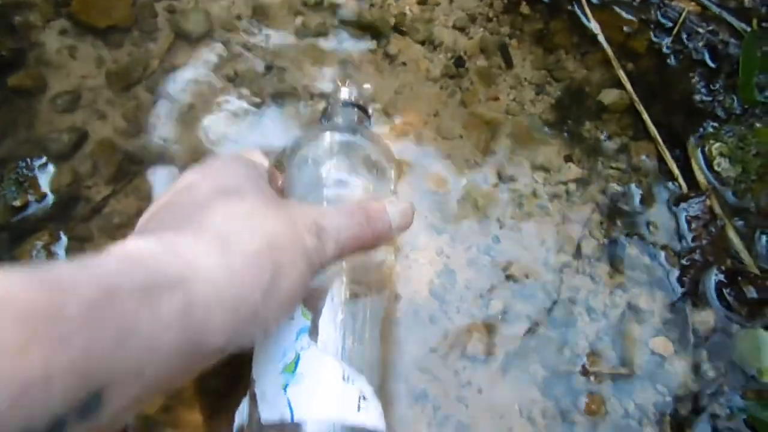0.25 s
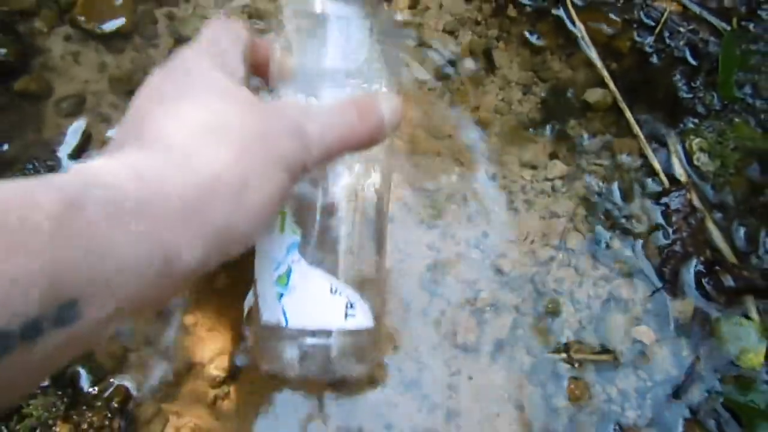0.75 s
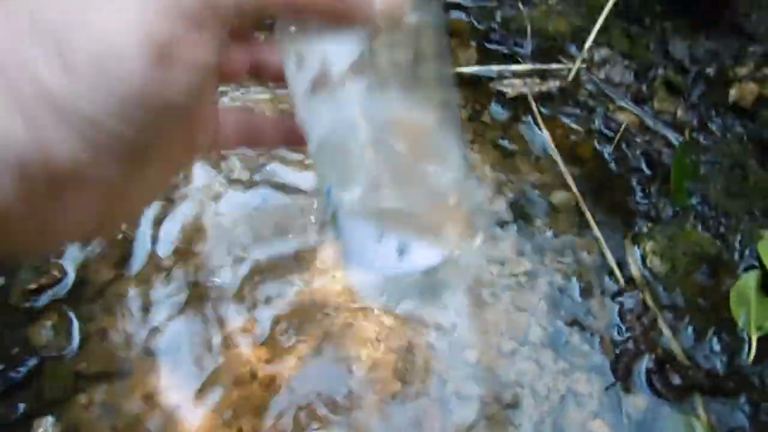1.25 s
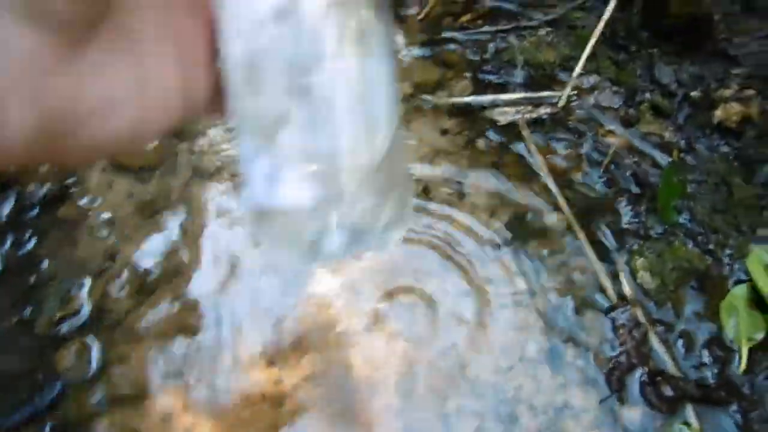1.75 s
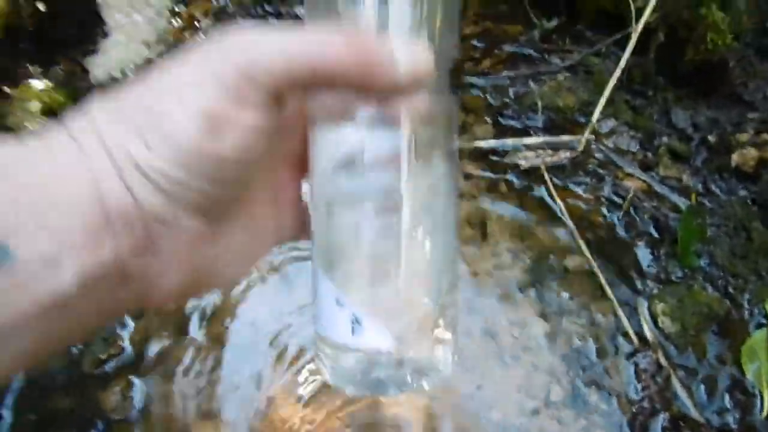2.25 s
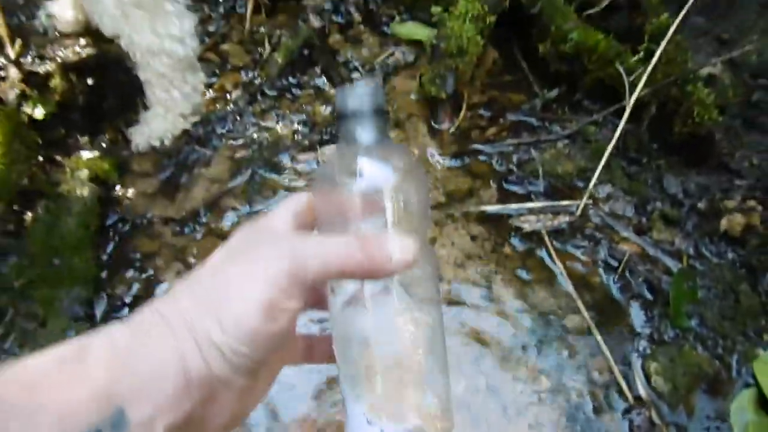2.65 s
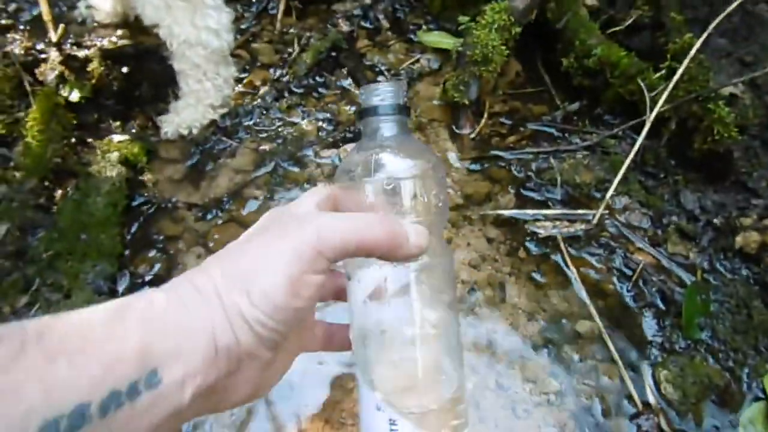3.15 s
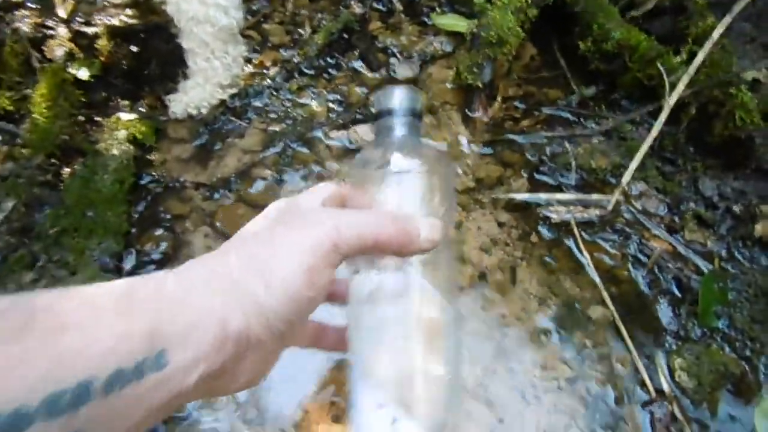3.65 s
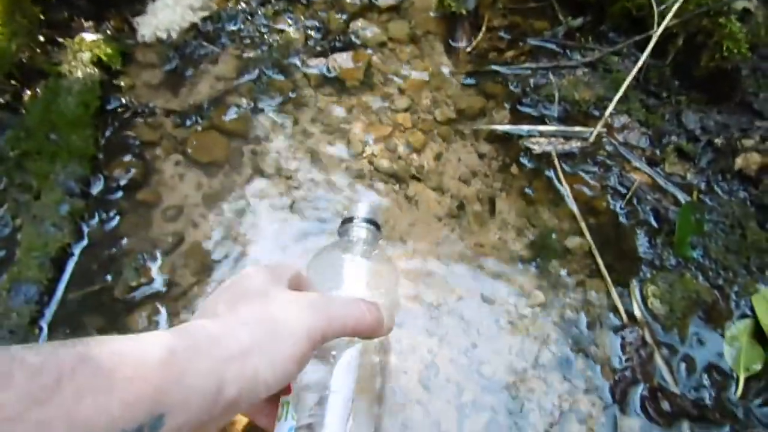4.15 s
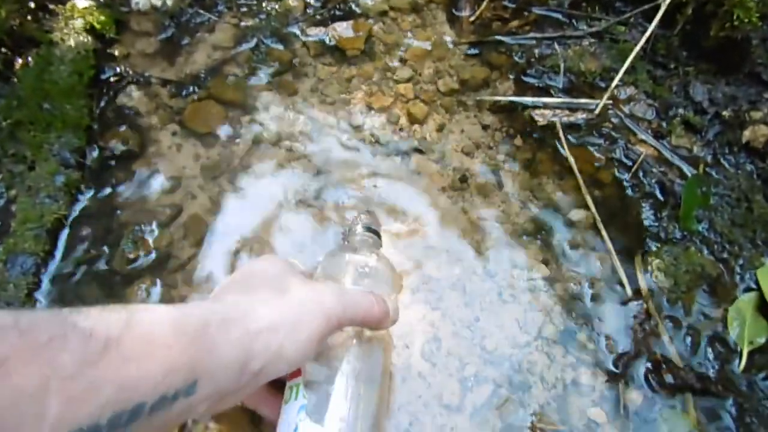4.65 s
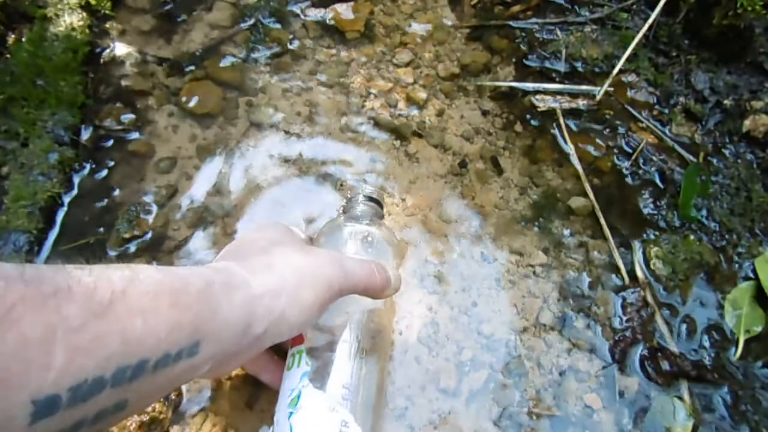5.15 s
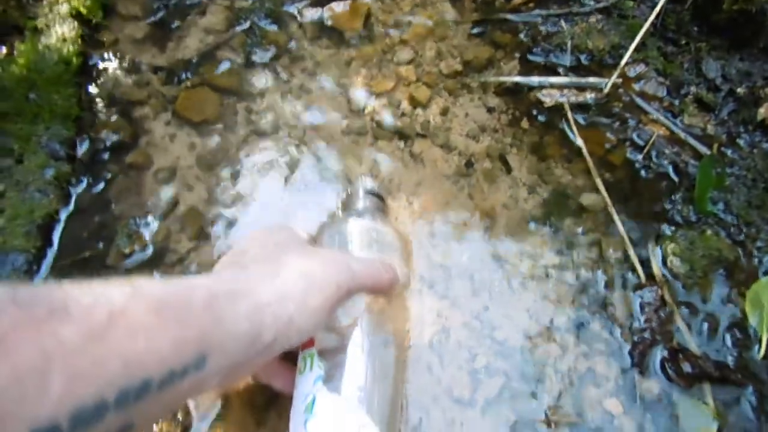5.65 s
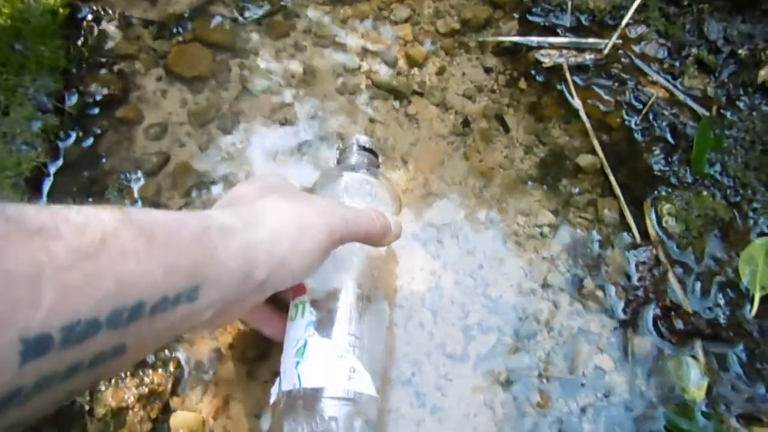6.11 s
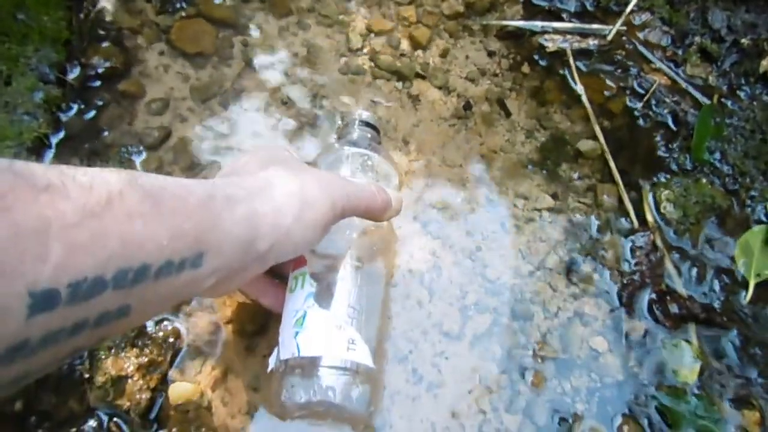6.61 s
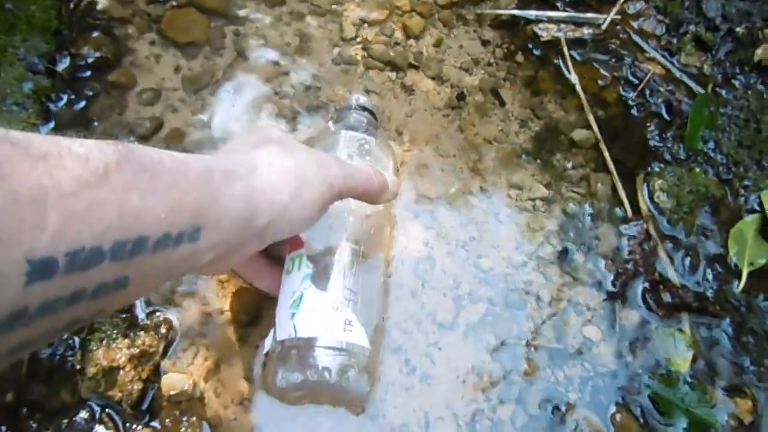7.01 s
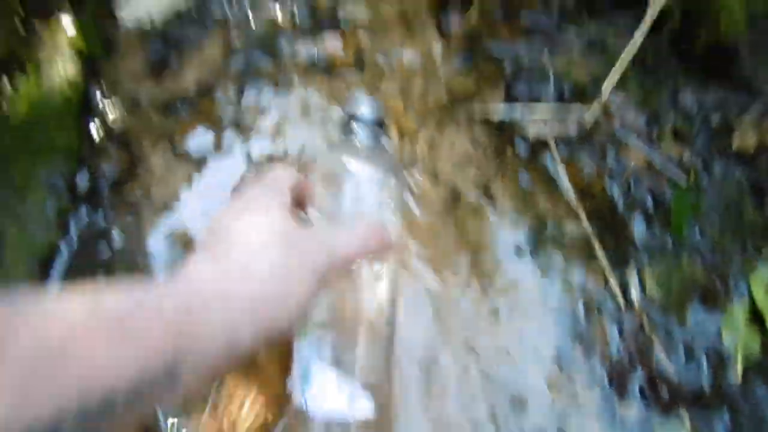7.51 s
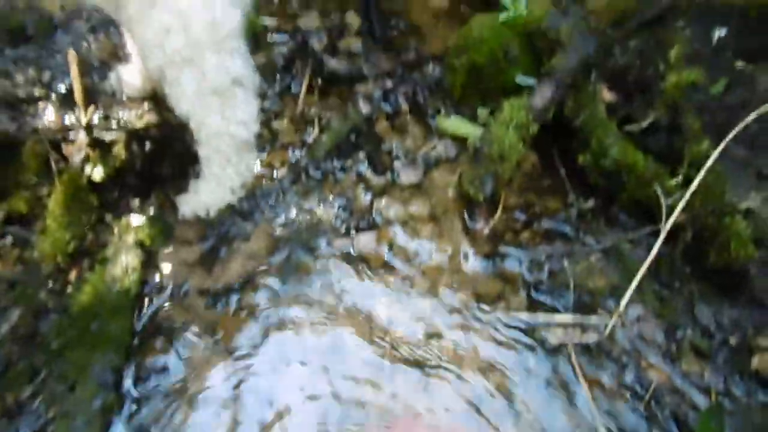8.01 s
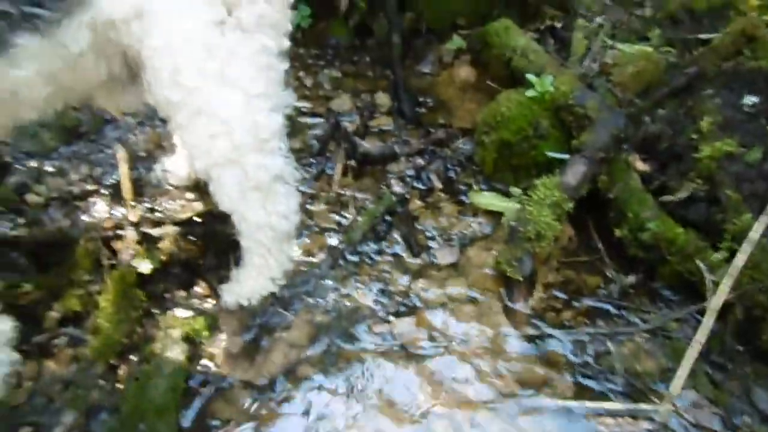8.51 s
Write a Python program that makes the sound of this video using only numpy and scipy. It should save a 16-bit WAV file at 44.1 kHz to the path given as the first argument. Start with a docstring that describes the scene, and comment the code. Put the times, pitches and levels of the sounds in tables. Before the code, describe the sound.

Outdoors in woodland, near the microphone, a hollow bottle rattles on streambed stones and water gurgles. A high, quick songbird chirps, then trills over a soft water wash. The bottle goes back in with light ticks and intermittent scrapes, then is pulled out with brighter crackles, plopping bubbles and splashing drops, ending in stream hush and a low handling thud.

```python
"""A plastic bottle is pushed into a shallow woodland stream, lifted, dipped again and taken out.
Its thin wall scrapes and ticks on the gravel: bursts and clicks of force excite damped wall modes.
Water gulps at the neck, drips back and trickles: decaying sines of rising pitch, for air in the water.
A small bird sings a long, fast song among the trees: gliding sines, frequency-modulated where they buzz.
Shaped noise makes the soft wash of the stream and a dull rumble near the end."""
import sys
import numpy as np
from scipy import signal
from scipy.fft import rfft, irfft, next_fast_len
from scipy.io import wavfile
from scipy.ndimage import uniform_filter1d

SR = 44100
rng = np.random.default_rng(int(sys.argv[2]) if len(sys.argv) > 2 else 0)


def pcm_store(signal):
    """Save signal as 16-bit PCM."""
    levels = np.round(np.clip(np.atleast_2d(signal), -1, 1) * 32767)
    wavfile.write(sys.argv[1], SR, levels.astype(np.int16).T)


N = 386757
TIME = np.arange(N) / SR  # s

# three figures of birdsong that the trills repeat, one syllable a row:
# delay/s, length/s, start f/Hz, end f/Hz, relative level/dB, buzz depth/Hz
CHIP = [(0, .07, 7870, 7320, -8.5, 258), (0.062, .028, 6160, 5900, -1.5, 60),
        (0.075, .049, 5400, 4950, 1, 650)]
BUZZ = [(0, 0.0664, 5330, 5110, 0, 650)]
UPSWEEP = [(0, 0.06, 4840, 5875, -.5, 542), (.033, .06, 6320, 6680, -1, 90.8),
           (.121, .046, 4850, 4100, -5, 480)]


def amp(db):
    """A level in decibels is 20 times the logarithm of amplitude; this inverts it to a gain."""
    return 10 ** (np.asarray(db) / 20)


def unit(x):
    """Normalises the root-mean-square amplitude to 1."""
    return x / np.sqrt(np.mean(x ** 2) + 1e-20)


def level(curve):
    """An envelope linear in decibels: gain at every sample from rows of t/s, level/dB."""
    return amp(np.interp(TIME, *np.transpose(curve)))


def add(mix, s, sound):
    """Superposition: sums a sound into the mix from time s."""
    part = mix[max(round(s * SR), 0):][:len(sound)]
    part += sound[:len(part)]


def colour(x, points):
    """Zero-phase spectral filtering: gain interpolated over log frequency from rows of f/Hz, gain/dB."""
    hz, db = np.transpose(points)
    size = next_fast_len(len(x))
    log_hz = np.log(np.fft.rfftfreq(size, 1 / SR) + 1)  # the 1 avoids log 0
    gain = amp(np.interp(log_hz, np.log(hz), db))
    return irfft(rfft(x, size) * gain, size)[:len(x)]


def grains(length, per_s, spread_db):
    """A random impulse train: clicks of either sign, mostly small, a few large."""
    sizes = amp(spread_db * np.minimum(rng.exponential(1, length), 4))
    signs = rng.choice([-1, 1], length)
    return sizes * signs * (rng.random(length) < per_s / SR)


def wash(wash_db=-58.45, swell_db=0.82):
    """Turbulence as broadband noise: the stream further off and the air in the trees, gently swelling."""
    # power spectrum of the wash: f/Hz, relative density/dB per Hz
    spectrum = [(12, -17), (20, -3), (53, -7), (70, -5), (146, -9), (188, -10), (282, -11.5), (353, -13),
                (443, -13.5), (854, -14), (921, -14), (2010, -16.5), (5110, -17.5), (7450, -19.5),
                (8240, -34), (10700, -62), (18100, -120)]
    swell = np.zeros(N)
    for f in np.geomspace(.3, 9, num=12):
        swell += np.sin(2 * np.pi * (f * TIME + rng.random())) / np.sqrt(f)
    noise = unit(colour(rng.standard_normal(N), spectrum))
    return amp(wash_db) * noise * amp(swell_db * unit(swell))


def bubble(hz, t60, rise):
    """Volume resonance: an air pocket rings and decays, rising in pitch (octaves/s) near the surface."""
    t = np.arange(int(t60 * SR) + 2) / SR
    turns = np.cumsum(hz * 2 ** (rise * t)) / SR
    decay = 1000 ** (-t / t60)
    onset = 1 - np.exp(-t * hz * 2)
    return np.sin(2 * np.pi * turns) * decay * onset


def stirring(attack_s=0.11, release_s=.13, calm_db=-69):
    """Powers of independent stirs add: each builds up, holds and calms down exponentially."""
    # water stirred by the hand, the bottle and a wading dog: t/s, length/s, level/dB
    stirs = [(.17, 0.52, -57), (2.499, 0.41, -69.5), (4.3, 0.64, -64), (5.6, 1.1, -66.5),
             (7.346, 0.39, -55.5), (8.333, 0.068, -60.5)]
    power = amp(calm_db) ** 2
    for s, length, db in stirs:
        before = np.maximum(s - TIME, 0)
        after = np.maximum(TIME - s - length, 0)
        gain = amp(db) * np.exp(-before / attack_s - after / release_s)
        power = power + gain ** 2
    return np.sqrt(power)


def trickle(per_s=45, cycles=12, spread_db=3.0, low_hz=450, high_hz=7000, tilt=0.69):
    """Many small bubbles of all sizes sum to a trickle, whose level follows the stirring of the water."""
    out = np.zeros(N)
    for hz in np.geomspace(low_hz, high_hz, num=40):
        t60 = cycles * rng.uniform(0.34, 2.4) / hz
        drop = bubble(hz, t60, 11) * (hz / low_hz) ** tilt
        out += signal.oaconvolve(grains(N, per_s, spread_db), drop)[:N]
    return unit(out) * stirring()


def resonate(x, hz, width):
    """A damped mode as one complex pole, whose radius sets the bandwidth; gain about 1 at its peak."""
    r = np.exp(-np.pi * width / SR)
    return 2 * signal.lfilter([1 - r], [1, -r * np.exp(2j * np.pi * hz / SR)], x).real


def wall(force, spread=0.00091, vary_db=3):
    """Modal response of the bottle to a force: a quick flutter of crowded modes and a few that ring on."""
    # modes of the wall, before random detuning and weighting: f/Hz, bandwidth/Hz, level/dB
    modes = [(600, 100, -11.5), (1030, 45, -11.5), (1160, 110, -11), (1937, 62, -2.5), (2034, 107, 2.5),
             (2460, 70, -6), (3207, 48, -1), (3580, 44, -9), (3990, 130, 2.5), (4360, 130, -2.5),
             (4970, 150, -8.5), (5520, 68, -13.5), (7040, 230, -1.5)]
    # broad colour of a grain of gravel on the wall: f/Hz, gain/dB
    contact = [(100, -20.5), (250, -10.5), (500, -1.5), (1000, -0.5), (1500, 1.5), (2000, -1.5),
               (3000, 4.5), (4200, -1.5), (5500, 1), (7200, -2.5), (8500, -17.5)]
    t = np.arange(SR // 200) / SR
    flutter = rng.standard_normal(len(t)) * np.exp(-t / spread)
    # keeping only the phase smears each click in time, with even colour
    flutter = irfft(np.exp(1j * np.angle(rfft(flutter))), len(t))
    force = np.convolve(np.pad(force, (0, SR // 20)), np.roll(flutter, SR // 2000))
    crowded = .5 * force
    ring = 0
    for hz, width, db in modes:
        a, b = rng.standard_normal(2)  # each point of contact favours other modes
        ring = ring + amp(db + vary_db * a) * resonate(force, hz * (1 + 0.018 * b), width)
    return colour(crowded + ring, contact)


def scrapes(per_s=2200, spread_db=3.5, hiss=0.26, arch=0.3, overrun=0.0052, body_db=9, uneven_db=2.0):
    """Stick-slip friction: each drag is a burst of tiny slips, and pressing down brings out the hollow body."""
    # the bottle drags over gravel: t/s, length/s, level/dB, low body from pressing down/dB (body_db adds)
    drags = [(0.108, 0.094, -52, -16), (0.255, 0.068, -45, -6.5), (.323, 0.022, -41, -3),
             (0.359, .014, -48, -6), (.411, .013, -48.5, -24), (.436, .031, -44, -8),
             (.482, 0.036, -38, -14), (0.537, 0.013, -39.5, -12), (0.554, 0.033, -39.5, -4.5),
             (.585, 0.065, -39.5, -3.5), (0.663, 0.0079, -40, -22), (0.679, 0.011, -42, -18),
             (0.716, 0.0064, -48, -20), (0.743, 0.047, -51, -18), (0.794, .02, -43, -6.5),
             (1.895, 0.015, -51, -18), (1.918, .075, -60.5, -17), (4.22, 0.1, -60, 0.5),
             (4.35, 0.047, -54, -6), (4.572, 0.19, -57.5, -2.5), (4.821, .11, -50.5, -5.5),
             (4.934, 0.08, -59, -14), (5.043, 0.052, -54, -7), (5.514, 0.097, -55, -4.5),
             (5.698, .07, -52, -16), (6.22, 0.018, -52.5, -19), (6.291, 0.07, -51, -3.5),
             (6.824, 0.029, -49.5, -5.5), (6.866, 0.093, -53.5, -11), (6.982, 0.086, -53.5, -4.5),
             (7.209, .014, -45.5, -10), (7.228, 0.053, -49, -9), (7.282, 0.036, -43, -10.5),
             (7.403, 0.035, -45, -20), (7.448, 0.051, -51, -12), (7.487, 0.018, -40, 3),
             (7.518, 0.036, -46, -12)]
    out = np.zeros(N)
    for s, length, db, press_db in drags:
        size = int((length + overrun) * SR)
        bumps = unit(uniform_filter1d(rng.standard_normal(SR // 2), size=300))[:size]  # over the stones
        stroke = np.hanning(size) ** (arch / 2)  # the bottle speeds up and sticks again
        stroke *= amp(uneven_db * bumps)
        slips = unit(grains(size, per_s, spread_db)) + hiss * rng.standard_normal(size)
        sound = wall(stroke * slips)
        # a hard drag makes the wall flex and crackle; pressing damps this slightly
        flex_db = 0.53 * (db + 46) - 0.02 * press_db
        balance = [(700, body_db + press_db), (1500, 0), (2000, flex_db),
                   (2500, 0.0085), (4200, 0.011), (6500, -2)]
        sound = colour(sound, balance)
        add(out, s, amp(db) * sound * np.sqrt(length * SR / np.sum(sound ** 2)))
    return out


def settling(count=14, from_s=4.3, to_s=6.8, middle_db=-43, spread_db=3.5):
    """A random point process: faint stones tick while the bottle lies and fills; rows of t/s, level/dB."""
    when, strength = rng.random((count, 2)).T
    times = from_s + (to_s - from_s) * when
    return list(zip(times, middle_db + spread_db * (2 * strength - 1)))


def ticks(decay=0.002, chatter=.35, gain_db=10, top_db=-4, low_db=-3):
    """Impulsive excitation: a stone or splashing drop gives a sharp click and a brief chatter."""
    # stones snap against the wall; the last two are clicks of drops splashing back into the water:
    # t/s, level/dB (gain_db adds)
    clicks = [(0.1917, -38), (0.2846, -28.5), (0.328, -28), (0.3406, -19.5), (0.4913, -28), (0.499, -21.5),
              (0.5447, -33), (0.5602, -28), (0.573, -30), (0.621, -20), (0.7198, -40), (4.2164, -30),
              (4.2233, -24), (5.2866, -39.5), (5.3353, -37), (5.3892, -32), (5.5872, -25.5), (6.0701, -38),
              (6.6888, -33.5), (6.834, -29.5), (6.894, -33.5), (6.9375, -30.5), (6.9807, -35),
              (7.0214, -33), (7.2185, -32), (7.4215, -28.5), (7.4914, -27), (7.5443, -28.5), (7.6236, -33),
              (7.6844, -28), (7.7624, -36)]
    out = np.zeros(N)
    t = np.arange(SR // 50) / SR
    for s, db in list(clicks) + settling():
        force = chatter * rng.standard_normal(len(t)) * np.exp(-t / decay)
        force[0] += 1
        # the drops' clicks are shaped by the same modes as the stones'
        sound = colour(wall(force), [(900, low_db), (1700, 0.0072), (4000, 0), (6000, top_db)])
        add(out, s, amp(db + gain_db) * sound / np.linalg.norm(sound))
    return out


def gulps(ring_s=0.071, ring_slope=0.44, rise=1.1):
    """Resonating air volumes: larger pockets and drops ring lower and longer (ring_s is t60 at 1 kHz)."""
    # air ringing in the bottle and in bubbles, and drops falling back: t/s, starting f/Hz, peak level/dB
    pockets = [(.291, 123, -46.5), (.445, 588, -47.5), (.497, 1290, -44), (.512, 1010, -42),
               (.58, 538, -44), (.622, 232, -48), (.81, 1250, -44), (4.225, 976, -52), (4.225, 1680, -44.5),
               (4.284, 1040, -50), (6.36, 168, -51.5), (6.84, 155, -52), (7.22, 179, -55), (7.3, 511, -44),
               (7.305, 1143, -44), (7.493, 657, -40.5), (7.495, 250, -49), (7.545, 714, -39.5),
               (7.685, 249, -39), (7.686, 876, -37), (7.698, 2640, -45), (7.702, 1670, -44),
               (7.731, 3440, -39.5), (7.763, 2250, -45.5), (7.773, 665, -45), (7.803, 1180, -44),
               (7.81, 1390, -44.5)]
    out = np.zeros(N)
    for s, hz, db in pockets:
        relative_size = 1000 / hz
        t60 = ring_s * relative_size ** ring_slope
        add(out, s, amp(db) * bubble(hz, t60, rise))
    return out


def echoes(x, t60, delay):
    """Diffuse reverberation: scattered reflections decay exponentially, with energy 1 in all."""
    t = np.arange(SR) / SR
    tail = grains(SR, 2500, 2.1) * 1000 ** (-t / t60) * (t > delay)
    return signal.oaconvolve(x, tail / np.linalg.norm(tail))[:N]


def syllables(soft_start_db=-2, swell_s=0.16):
    """Song as a sequence: single notes, then each trill's figure repeated, starting softly and swelling."""
    # single notes of the songbird and its fainter neighbours:
    # t/s, length/s, start f/Hz, end f/Hz, level/dB, buzz depth/Hz
    notes = [(.99, 0.038, 7700, 7340, -59.5, 100), (1.07, .067, 6250, 5950, -57, 282),
             (1.47, 0.06, 5250, 4500, -59, 220), (1.587, 0.084, 6050, 6370, -59.5, 0),
             (1.668, .033, 6050, 5730, -63, 0), (2.5, 0.068, 7850, 7360, -64.5, 260),
             (2.578, 0.078, 3890, 3980, -56.5, 0), (2.654, .13, 1720, 1660, -68.5, 150),
             (2.705, .037, 6700, 6930, -53.5, 250), (2.729, .11, 7260, 7010, -49, 1.5),
             (2.75, 0.12, 3940, 3760, -67.5, 219), (2.875, .16, 3680, 3335, -60, 260),
             (3.027, 0.21, 3315, 3130, -65.5, 260), (3.986, 0.053, 8060, 7030, -51.5, 330),
             (4.092, 0.093, 3674, 4020, -53, 1), (5.239, 0.102, 4293, 4190, -48.5, 30),
             (5.44, 0.25, 8000, 7730, -67, 180), (5.663, 0.074, 6020, 5855, -49.5, 2),
             (5.699, 0.057, 5860, 4770, -51.5, 400), (7.006, 0.039, 8150, 6780, -55, 299),
             (7.051, 0.17, 4260, 4010, -56.5, 170), (7.241, 0.48, 4020, 3930, -61, 222),
             (7.686, .069, 6450, 6820, -50, -7), (7.761, .14, 6970, 7450, -55.5, 228)]
    # trills: t/s, figure, repeats, period/s, level/dB
    trills = [(1.875, CHIP, 3, 0.21, -54), (2.929, BUZZ, 13, .0814, -50), (4.198, UPSWEEP, 5, .2012, -50),
              (5.901, BUZZ, 11, 0.081, -64.5)]
    rows = list(notes)
    for s, figure, repeats, period, db in trills:
        for since in period * np.arange(round(repeats)):
            effort_db = db + soft_start_db * np.exp(-since / swell_s)
            for delay, length, start, end, part_db, buzz in figure:
                rows.append((s + since + delay, length, start, end, effort_db + part_db, buzz))
    return rows


def bird(buzz_hz=180, attack=0.0058, release=0.01, waver=.004, tremor=0.0033, swing_db=4):
    """Frequency modulation: a near-pure whistle glides in pitch; buzzy syllables zigzag fast about it."""
    out = np.zeros(N)
    for s, length, start, end, db, buzz in syllables():
        t = np.arange(int(length * SR)) / SR
        glide = end + (start - end) * (1 - t / length) ** 1.7  # quick at first, then settles on its end pitch
        a, b = rng.standard_normal(2)
        unsteady = unit(uniform_filter1d(rng.standard_normal(SR), size=130))[:len(t)]
        buzz_rate = buzz_hz * (1 + .04 * b + 0.069 * unsteady)
        zigzag = signal.sawtooth(2 * np.pi * np.cumsum(buzz_rate) / SR, .5)  # triangle wave
        hz = glide * (1 + waver * a + tremor * unsteady) + buzz * zigzag
        # weaker as the pitch swings off the throat's resonance
        throat = amp(-swing_db * (buzz * zigzag / 600) ** 2)
        whistle = np.sin(2 * np.pi * np.cumsum(hz) / SR)
        note = throat * whistle * np.tanh(t / attack) * np.tanh((length - t) / release)
        add(out, s, amp(db + .5 * b) * unit(note))  # harder notes buzz faster
    return out


def handling():
    """Low-frequency noise under a slow envelope: a dull rumble as the hand shifts."""
    # colour of the rumble: f/Hz, gain/dB
    thud = [(20, -6.5), (60, 0.5), (100, -11), (200, -27), (480, -15.5), (800, -28.5), (1350, -28.5),
            (1700, -20.5), (2100, -32.5), (3000, -48.5)]
    # its course: t/s, level/dB
    shifts = [(7.9, -91), (8.3, -71), (8.45, -62), (8.48, -53.5), (8.58, -51), (8.62, -57), (8.77, -67)]
    return unit(colour(rng.standard_normal(N), thud)) * level(shifts)


def scene():
    """Direct and reflected sound: the bottle is close and nearly dry; the bird comes mostly by the trunks."""
    near = scrapes() + ticks() + gulps() + trickle()
    song = bird()
    banks = amp(-16) * echoes(near, t60=0.27, delay=0.0046)
    trees = amp(-0.5) * echoes(song, t60=0.5, delay=.003)
    straight = amp(-7) * song
    return (near + banks + straight + trees + wash() + handling())[None]


def record(dry, edge_hz=8150):
    """Band limitation: a linear-phase low-pass removes the highest treble."""
    lowpass = signal.firwin(221, edge_hz, window=("kaiser", 8), fs=SR)
    return signal.oaconvolve(dry, lowpass[None], "same")


dry = scene()
out = record(dry)
pcm_store(out)
```